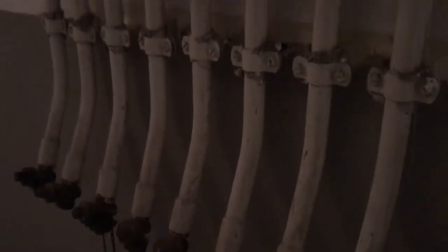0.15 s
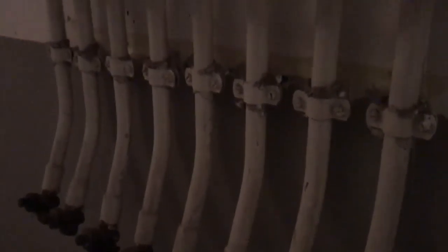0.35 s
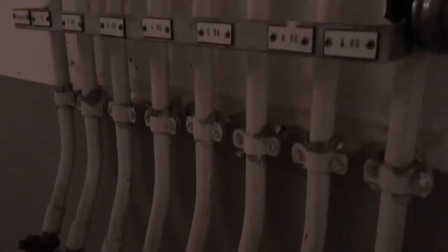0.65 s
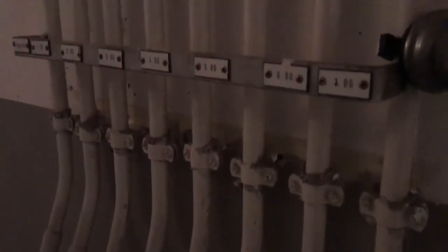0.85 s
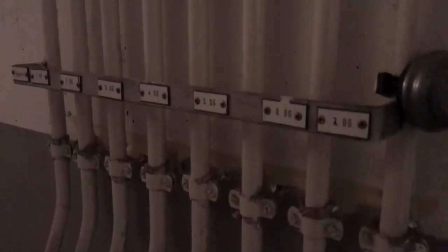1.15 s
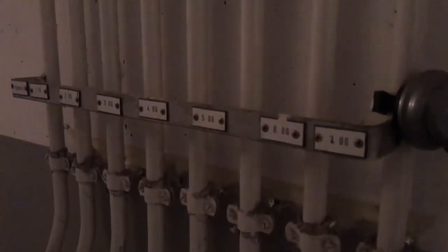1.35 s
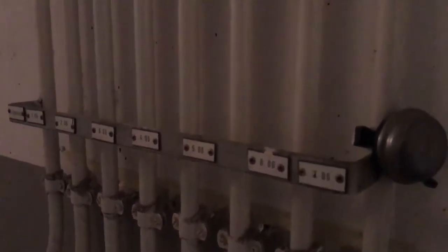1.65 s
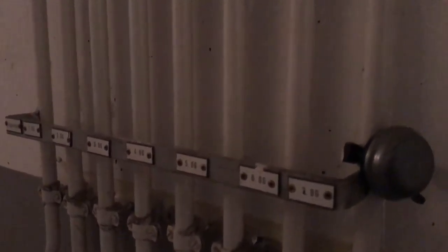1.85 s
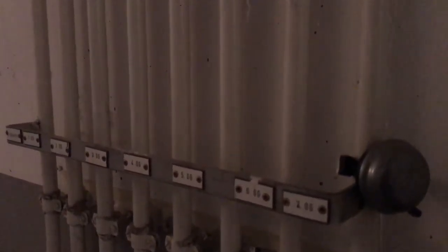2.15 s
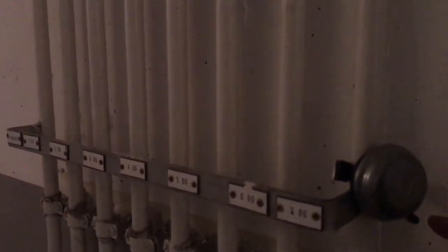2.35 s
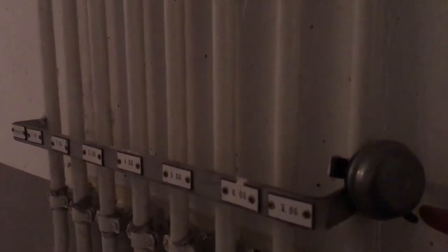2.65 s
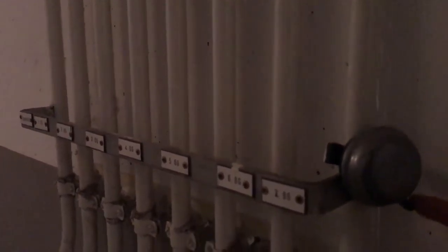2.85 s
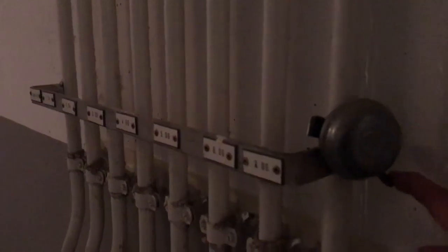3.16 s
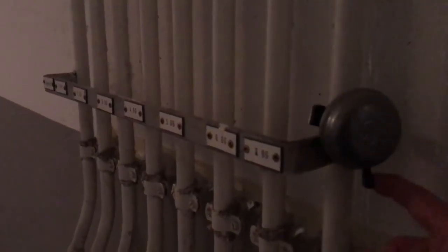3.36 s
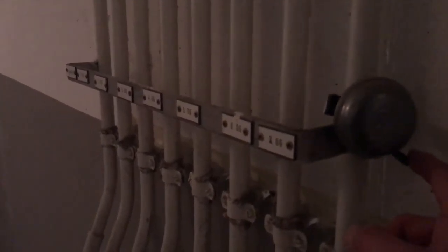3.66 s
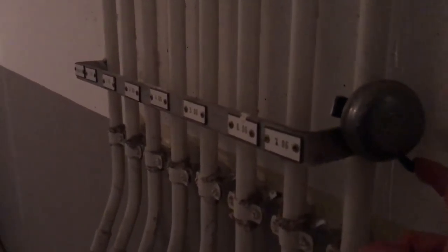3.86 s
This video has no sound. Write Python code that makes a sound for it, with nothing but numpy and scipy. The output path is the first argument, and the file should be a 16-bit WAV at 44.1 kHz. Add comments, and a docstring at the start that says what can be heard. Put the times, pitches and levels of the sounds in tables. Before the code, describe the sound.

Bicycle bell double-dings twice quickly, then dings once more, after soft sleeve rustling in a hard-walled room

```python
"""In a quiet, hard-walled room with a mains hum, an earlier thud dies away and a few faint clinks are heard.
A sleeve rustles as an arm reaches out, and the spring of a bicycle bell pings as a finger meets the lever.
Then the bell rings three times: gears tick and scrape, a rotor rattles, and the clapper hits the dome twice,
twice again while the lever squeaks back, and then once. Close pairs of dome tones beat as they ring.
Sine waves that fade away make the tones, and noise shaped by a spectrum makes the rest."""
import sys
import numpy as np
from scipy import signal
from scipy.fft import rfft, irfft
from scipy.io import wavfile

SR = 44100
rng = np.random.default_rng(int(sys.argv[2]) if len(sys.argv) > 2 else 0)


def file_out(sig):
    """Save sig as 16-bit WAV at sys.argv[1]."""
    # one column per channel
    cols = np.atleast_2d(sig).T
    # limit, then scale
    lim = np.clip(cols, -1, 1)
    pcm = np.round(lim * 32767).astype(np.int16)
    wavfile.write(sys.argv[1], SR, pcm)


N = 176400
TIME = np.arange(N) / SR  # seconds

# Blows of the clapper. Each row: start in seconds, level of the click in dB,
# then the level in dB of each of the eight dome tones.
BLOWS = [(3.3156, -10, -47, -38, -23.5, -28.5, -32, -20.5, -11, -24.5),
         (3.344, -12.5, -45, -44.5, -26.5, -32.5, -29, -20, -15.5, -22),
         (3.5635, -12.5, -58, -39, -23.5, -47, -27, -24.5, -19, -22.5),
         (3.6000, -15, -41.5, -46, -33, -34.5, -22.5, -24.5, -18.5, -29),
         (3.989, -10, -41, -39.5, -22.5, -35, -29, -17.5, -11, -18)]
# Colour of a tick of the gears, also used for the rotor. Each row: frequency in Hz, relative level in dB.
TICK_COLOUR = [(700, -54), (1300, -2.5), (2000, 0), (2700, -7.5), (3800, 3), (5000, -3.5), (9500, -10.5),
               (12000, -14), (16000, -22.5)]
# Colour of a light brushing contact. Each row: frequency in Hz, relative level in dB.
BRUSH_COLOUR = [(1000, -20.5), (3500, 1), (6500, -3), (10000, -8), (15000, -5)]


def from_db(db):
    """Turn decibels into a gain."""
    return 10 ** (np.asarray(db) / 20)


def rms_one(x):
    """Scale a signal to an rms (average strength) of one."""
    return x / np.sqrt(np.mean(x ** 2) + 1e-20)


def colour(x, points):
    """Shape a signal by a spectrum; white noise keeps its power."""
    hz, db = np.transpose(points)[:2]
    bins_hz = np.fft.rfftfreq(2 * N, 1 / SR)
    gain = from_db(np.interp(np.log(bins_hz + 1), np.log(hz), db))
    # The double length keeps the end from wrapping round to the start.
    return irfft(rfft(x, 2 * N) * rms_one(gain))[:N]


def noise(points):
    """Steady noise with the given spectrum and an rms of about one."""
    return colour(rng.standard_normal(N), points)


def drift(rate):
    """Random values, `rate` per second, joined by lines; after 4000 values the last one holds."""
    return np.interp(TIME * rate, np.arange(4000), rng.standard_normal(4000))


def fade(s, tau):
    """A sudden start at s, then an exponential decay with time constant tau (seconds)."""
    return (TIME >= s) * np.exp(-np.clip((TIME - s) / tau, 0, 60))


def swell(s, half):
    """A bell-shaped rise and fall around s; `half` is its spread in seconds."""
    return np.exp(-.5 * np.minimum(((TIME - s) / half) ** 2, 100))


def ring(s, hz, t60):
    """One tone set ringing at s; it falls by 60 dB in t60 seconds."""
    return fade(s, t60 / np.log(1000)) * np.sin(2 * np.pi * hz * (TIME - s))


def bursts(spectrum, level):
    """Contact noise that follows a level curve, coloured by the part that it shakes."""
    return colour(rng.choice([-1, 1], N) * level, spectrum)


def runs(rows):
    """Level of moving parts that start, run for a while and stop."""
    fade_s = 0.0076
    level = np.zeros(N)
    for s, length, db in rows:
        rise = np.clip((TIME - s) / fade_s, 0, 1)
        stop = np.where(TIME < s + length, 1, fade(s + length, fade_s))
        level += from_db(db) * rise * stop
    return level


def background():
    """Mains hum made of steady sines, and still air made of soft noise."""
    # Each row: frequency in Hz, rms level in dB.
    hum_tones = [(100, -57.5), (300, -76)]
    # Each row: frequency in Hz, relative level in dB.
    air_colour = [(20, -28), (60, -5.5), (110, -8), (160, -7.5), (220, -13), (310, -13), (450, -18),
                  (1300, -25.5), (4000, -31), (10400, -40), (14400, -28.5), (16000, -38)]
    air_db = -63.5
    hum = sum(from_db(db) * np.sqrt(2) * np.sin(2 * np.pi * hz * TIME) for hz, db in hum_tones)
    return hum + from_db(air_db) * noise(air_colour)


def dying_thud():
    """The echoes of an earlier thud: each band of noise dies at its own pace, the treble soonest."""
    # Each row: frequency in Hz, relative level per Hz in dB, time to fall by 60 dB in seconds.
    thud_bands = [(60, -18, 1.8), (146, 2, 2.83), (390, -1.5, 2.52), (1320, -6, 2.19), (2970, -16.5, 2.3),
                  (6000, -21, 1.1), (14000, -20, 0.28)]
    # Tones left ringing. Each row: frequency in Hz, level in dB, time to fall by 60 dB in seconds.
    thud_tones = [(63, -50.5, 4.1), (6880, -68, 0.5), (8974, -58.5, 0.39), (11200, -64, 0.34),
                  (11500, -64, 0.4), (13450, -65, 0.34)]
    thud_db = -46.5
    hz, _, t60s = np.transpose(thud_bands)
    log_bins = np.log(np.fft.rfftfreq(N, 1 / SR) + 1)
    no_rumble = signal.butter(2, 50, "high", fs=SR, output="sos")
    spectrum = rfft(signal.sosfilt(no_rumble, noise(thud_bands)))
    tail = np.zeros(N)
    for band, t60 in zip(np.eye(len(hz)), t60s):
        # Each band is full at its own frequency and fades out towards its neighbours.
        share = np.interp(log_bins, np.log(hz), band)
        tail += irfft(spectrum * share, N) * fade(0, t60 / np.log(1000))
    tones = sum(from_db(db) * ring(0, hz, t60) for hz, db, t60 in thud_tones)
    return from_db(thud_db) * tail + tones


def clinks():
    """Small light contacts of handling, each a short brush of noise with a bright resonance."""
    # Each row: start in seconds, frequency in Hz, level of the resonance in dB.
    clink_rows = [(.266, 7000, -69.5), (.5, 6740, -69), (.588, 6300, -70.5)]
    decay_s, half_width_hz, brush_db = 0.058, 220, 5  # brush level is relative to the resonance
    out = np.zeros(N)
    white = rng.standard_normal(N)
    brush = from_db(brush_db) * noise(BRUSH_COLOUR)
    for s, hz, db in clink_rows:
        band = signal.butter(1, [hz - half_width_hz, hz + half_width_hz], "band", fs=SR, output="sos")
        resonance = rms_one(signal.sosfilt(band, white))
        out += from_db(db) * fade(s, decay_s) * (resonance + brush)
    return out


def handling():
    """A sleeve rustles as the arm reaches out: noise that swells with each move, brush and shuffle."""
    # Sleeve moves. Each row: peak in seconds, rise in seconds, fall in seconds, level in dB.
    rustles = [(1.155, 0.0054, 0.031, -71), (1.785, 0.014, 0.4, -64.5), (2.08, .015, 0.22, -62),
               (2.275, 0.027, 0.22, -56.5), (2.42, 0.03, 0.096, -56.5), (2.88, 0.14, 0.42, -52),
               (3.12, 0.13, 0.69, -48)]
    # Brighter brushes of cloth. Each row: peak in seconds, half length in seconds, level in dB.
    brushes = [(2.088, .012, -63.5), (2.277, 0.0025, -59), (2.42, 0.018, -52.5), (2.745, 0.011, -57)]
    # Soft shuffles. Each row: peak in seconds, half length in seconds, level in dB.
    shuffles = [(.32, 0.023, -60.5), (1.19, 0.037, -70), (1.55, 0.051, -69.5), (1.9, 0.11, -66),
                (2.43, 0.037, -59), (2.57, 0.047, -58.5), (3.5, 0.54, -60)]
    # Colours of rustle and shuffle. Each row: frequency in Hz, relative level in dB.
    sleeve_colour = [(180, -25), (300, -7.5), (460, -9.5), (645, -1), (737, -3.5), (1690, -3), (5430, -8),
                     (14700, -23), (16000, -14)]
    shuffle_colour = [(100, 1), (300, 2.5), (600, -0.5), (1100, 4.5), (2000, -5), (5000, -33)]
    rough_db = 1.2
    power = np.zeros(N)
    for s, rise, fall, db in rustles:
        shape = np.where(TIME < s, swell(s, rise), fade(s, fall))
        power += (from_db(db) * shape) ** 2
    out = noise(sleeve_colour) * np.sqrt(power) * from_db(rough_db * drift(90))
    for rows, spectrum in ((brushes, BRUSH_COLOUR), (shuffles, shuffle_colour)):
        out += noise(spectrum) * sum(from_db(db) * swell(s, half) for s, half, db in rows)
    return out


def spring():
    """The finger meets the lever and its spring pings in a few high tones with a softened start."""
    # Each row: frequency in Hz, level in dB, time to fall by 60 dB in seconds.
    spring_tones = [(12880, -45, 0.31), (12780, -45, 0.21), (11200, -56, 0.39), (6850, -55, 0.27)]
    start_s, attack_s = 3.046, 0.0023
    tones = sum(from_db(db) * ring(start_s, hz, t60) for hz, db, t60 in spring_tones)
    return (1 - fade(start_s, attack_s)) * tones


def lever():
    """The lever slides back in rough squeaks of rising pitch with overtones, and knocks on its stop."""
    # Squeaks. Each row: peak in seconds, pitch there in Hz, rise of pitch in Hz per second, level in dB.
    squeaks = [(3.515, 3240, 18000, -34), (3.548, 2850, 25000, -37), (3.584, 2120, 5000, -31)]
    # The knock: frequency in Hz, level in dB, time to fall by 60 dB in seconds.
    stop_knock = (1515, -33, 0.13)
    half_s, pitch_spread_hz, rough_db, stop_at_s = 0.0035, 260, 5, 3.597
    # This fast drift holds its last value before the squeaks, so they share one random pitch shift.
    pitch_shift = pitch_spread_hz * drift(1500)
    grip = from_db(rough_db * drift(700))
    out = np.zeros(N)
    for s, hz, glide, db in squeaks:
        phase = 2 * np.pi * np.cumsum(hz + glide * (TIME - s) + pitch_shift) / SR
        # Levels drop 3 dB per step through the harmonics, the first one included.
        tones = sum(from_db(db - 3 * k) * np.sin(k * phase) for k in range(1, 4))
        out += grip * swell(s, half_s) * tones
    hz, db, t60 = stop_knock
    return out + from_db(db) * ring(stop_at_s, hz, t60)


def teeth():
    """Gear teeth and lever knocks: short noise ticks, and softened clicks that ring the works."""
    # Each row: start in seconds, level of the ring in dB, level of the tick in dB.
    knocks = [(3.2772, -28, -47), (3.2958, -45, -29), (3.3030, -30, -31.5), (3.309, -34, -38),
              (3.322, -32.5, -45), (3.3380, -35, -45), (3.3610, -36, -55), (3.6020, -35.5, -31),
              (3.9533, -30.5, -39), (3.9680, -41, -27.5), (3.975, -37, -32), (3.984, -33, -47)]
    # Tones of the works. Each row: frequency in Hz, relative level in dB, time to fall by 60 dB in seconds.
    works_tones = [(1360, -27, .07), (1498, -18, 0.19), (1839, -15, 0.53), (1883, -6.5, 0.24),
                   (1948, -13.5, 0.14), (2080, -21, 0.07)]
    tick_decay_s, spread_db = 0.0017, 1.8
    out = bursts(TICK_COLOUR, sum(from_db(db) * fade(s, tick_decay_s) for s, _, db in knocks))
    times, ring_db, _ = np.transpose(knocks)
    places = np.clip((times * SR).astype(int), 0, N - 1)
    for hz, db, t60 in works_tones:
        clicks = np.zeros(N)
        clicks[places] = from_db(ring_db + db + rng.normal(0, spread_db, len(times)))
        band = signal.butter(1, [.8 * hz, 1.25 * hz], "band", fs=SR, output="sos")
        soft = signal.sosfilt(band, clicks + 1e-18)
        # A resonator: each click sets off a sine that shrinks by `shrink` every sample.
        shrink, turn = from_db(-60 / (t60 * SR)), 2 * np.pi * hz / SR
        feedback = [1, -2 * shrink * np.cos(turn), shrink * shrink]
        out += signal.lfilter([0, np.sin(turn)], feedback, soft + 1e-18)
    return out


def rotor():
    """The spinning rotor rattles: a crowd of random tiny clicks over smooth noise of the same colour."""
    # Each row: start in seconds, length in seconds, level of the whole rattle in dB.
    spins = [(3.286, .085, -44.5), (3.548, 0.092, -44.5), (3.959, .06, -41.5)]
    grains_per_s = 1100
    sparse = (rng.random(N) < grains_per_s / SR) * rng.standard_normal(N)
    grains = rms_one(colour(sparse, TICK_COLOUR))
    rattle = rms_one(grains + noise(TICK_COLOUR))
    return rattle * runs(spins)


def gear_scrape():
    """The gears scrape while the lever is pushed: coloured noise with a rough, uneven level."""
    # Each row: start in seconds, length in seconds, level in dB.
    scrapes = [(3.286, 0.079, -41), (3.955, .06, -42.5)]
    # Each row: frequency in Hz, relative level in dB.
    scrape_colour = [(900, -41), (1400, -10), (1720, -22), (1885, 1.5), (2050, -10.5), (2500, -35),
                     (3700, -14.5), (6000, -32)]
    rough_db = 3
    return noise(scrape_colour) * from_db(rough_db * drift(300)) * runs(scrapes)


def bracket():
    """The metal strip that carries the bell rings low and faint at each blow."""
    # Each row: frequency in Hz, level relative to the click in dB, time to fall by 60 dB in seconds.
    bracket_tones = [(301, -56.5, 0.83), (467, -54.5, 0.69), (510, -52.5, 1.3), (544, -51, 1.2)]
    out = np.zeros(N)
    for s, click_db, *_ in BLOWS:
        out += sum(from_db(click_db + db) * ring(s, hz, t60) for hz, db, t60 in bracket_tones)
    return out


def clapper():
    """Each blow is a hard noise click with a short rattling tail and a brief, dense high ring."""
    # Each row: frequency in Hz, relative level in dB.
    click_colour = [(700, -35), (1100, -24.5), (1600, -6), (2500, -11), (4700, -5.5), (6700, 5), (8400, 1),
                    (9400, -3), (10900, -1.5), (11700, 9.5), (12800, -3), (13850, 4.5), (14600, -8),
                    (16200, -12)]
    # Each row: frequency in Hz, level relative to the click in dB, time to fall by 60 dB in seconds.
    high_tones = [(7070, -28, 0.14), (11600, -24, 0.073), (11800, -22, 0.14), (14000, -32, .09),
                  (13930, -33, .07), (15410, -40, .1), (15690, -39, .1)]
    click_s, tail_s, tail_db = 0.00057, 0.015, -25.5  # decay times; tail level relative to the click
    level, tones = np.zeros(N), np.zeros(N)
    for s, click_db, *_ in BLOWS:
        level += from_db(click_db) * (fade(s, click_s) + from_db(tail_db) * fade(s, tail_s))
        tones += sum(from_db(click_db + db) * ring(s, hz, t60) for hz, db, t60 in high_tones)
    return bursts(click_colour, level) + tones


def dome():
    """Each blow catches the dome and starts it anew; twin tones start opposed and beat."""
    # The eight tones, in four close pairs: frequency in Hz.
    dome_hz = [1591.6, 1625.7, 4186.2, 4238.2, 7653.0, 7732.0, 11852.0, 11949.5]
    # How long each tone rings: time to fall by 60 dB in seconds.
    dome_t60_s = [8.6, 3.5, 1.87, 4.6, 0.95, 0.67, 0.32, 0.32]
    catch_s = .0006  # how fast the next blow stops the old ring
    out = np.zeros(N)
    ends = [row[0] for row in BLOWS[1:]] + [N / SR]
    for (s, _, *levels), end in zip(BLOWS, ends):
        held = np.where(TIME < end, 1, fade(end, catch_s))
        for k, (db, hz, t60) in enumerate(zip(levels, dome_hz, dome_t60_s)):
            out += (-1) ** k * held * from_db(db) * ring(s, hz, t60)
    return out


def room(x):
    """Hard walls blur a sound into a tail of fading noise, shorter in the treble."""
    t60_s, treble_t60_s = 2.25, 0.16
    white = rng.standard_normal(N)
    lowpass = signal.butter(2, 3500, fs=SR, output="sos")
    low = signal.sosfilt(lowpass, rng.standard_normal(N))
    tail = low * fade(0.0055, t60_s / np.log(1000)) + white * fade(0.01, treble_t60_s / np.log(1000))
    return signal.fftconvolve(x, tail / np.linalg.norm(tail))[:N]


def scene():
    """The bell close by with its echo in the room, over handling noise, the thud and the background."""
    room_db = -15
    surroundings = background() + dying_thud() + clinks() + handling()
    works = teeth() + rotor() + gear_scrape()
    bell = spring() + lever() + works + bracket() + clapper() + dome()
    return (surroundings + bell + from_db(room_db) * room(bell))[None]


def record(dry):
    """Cut the top of the treble steeply."""
    cutoff_hz = 15900
    return signal.sosfilt(signal.ellip(10, .1, 80, cutoff_hz, fs=SR, output="sos"), dry)


dry = scene()
out = record(dry)
file_out(out)
```